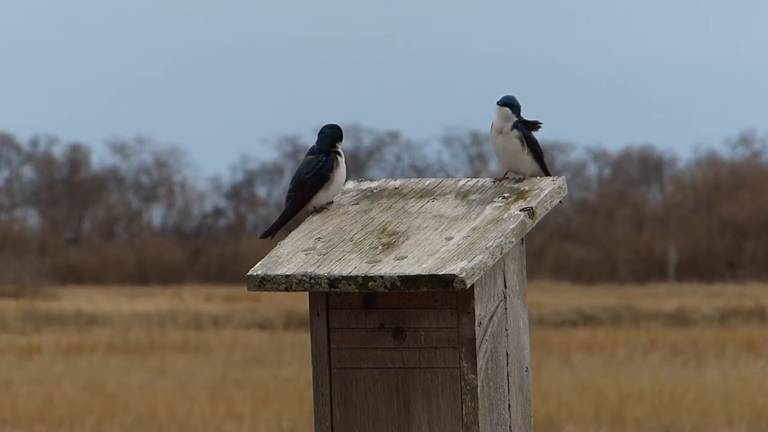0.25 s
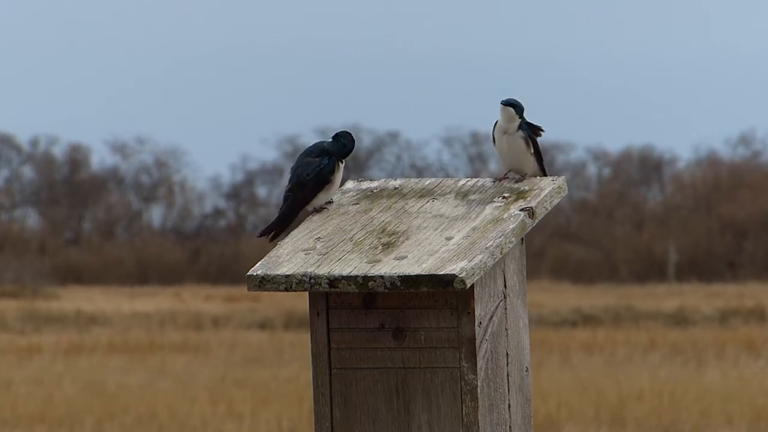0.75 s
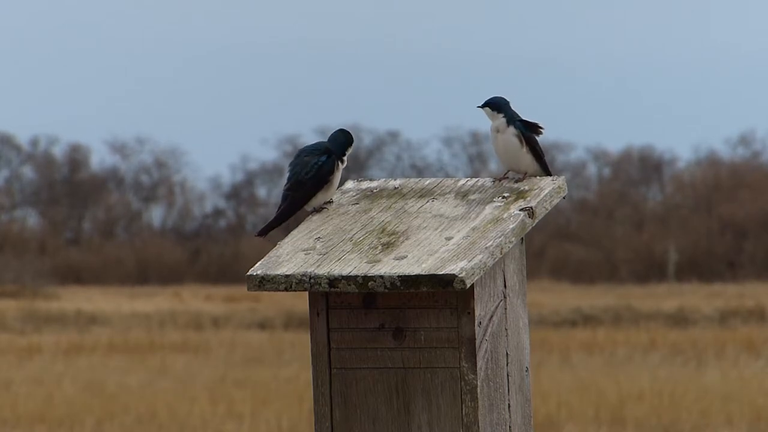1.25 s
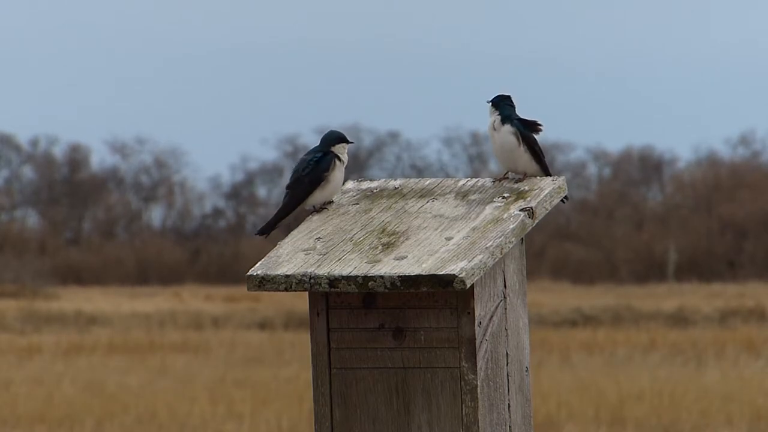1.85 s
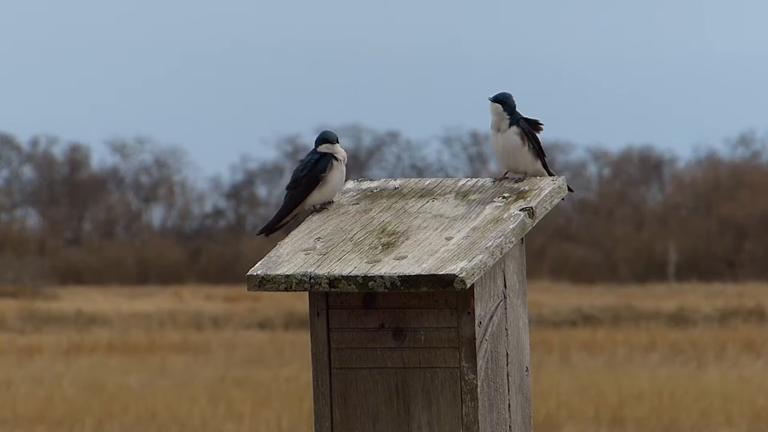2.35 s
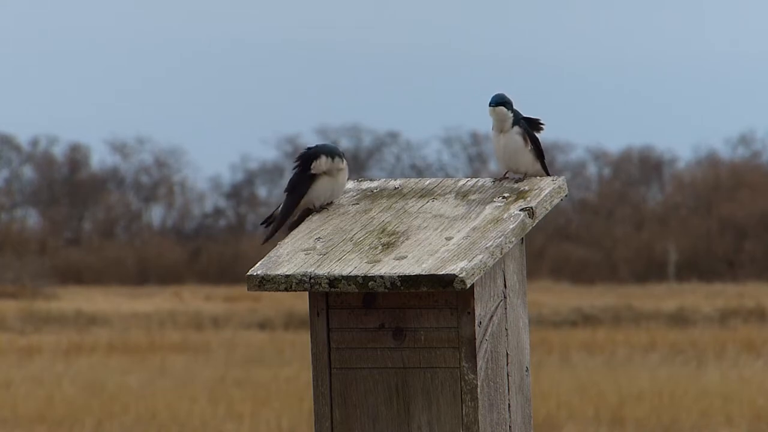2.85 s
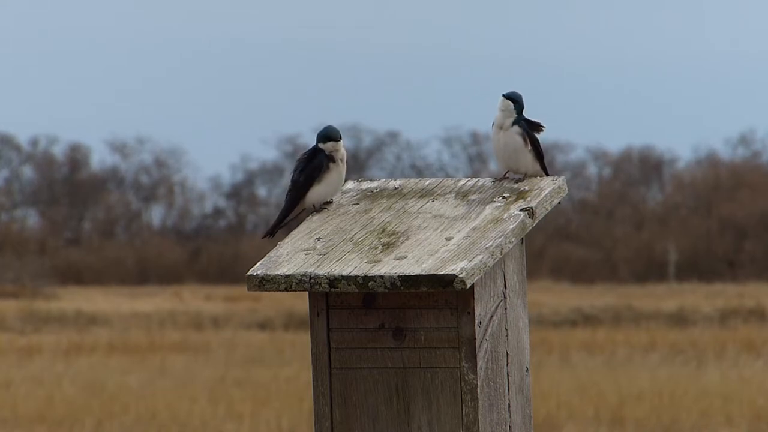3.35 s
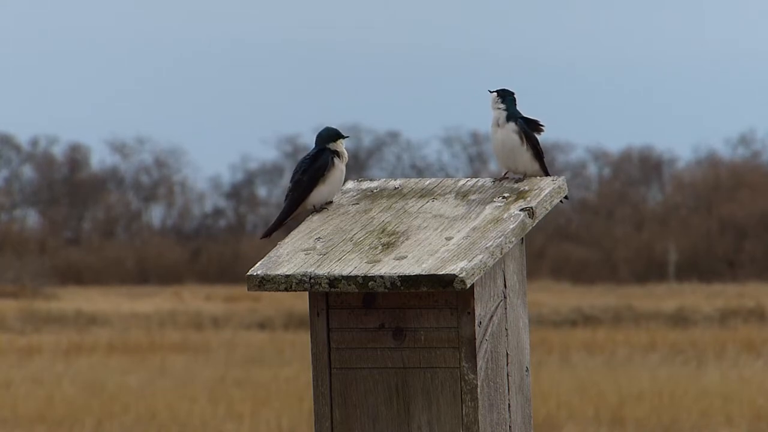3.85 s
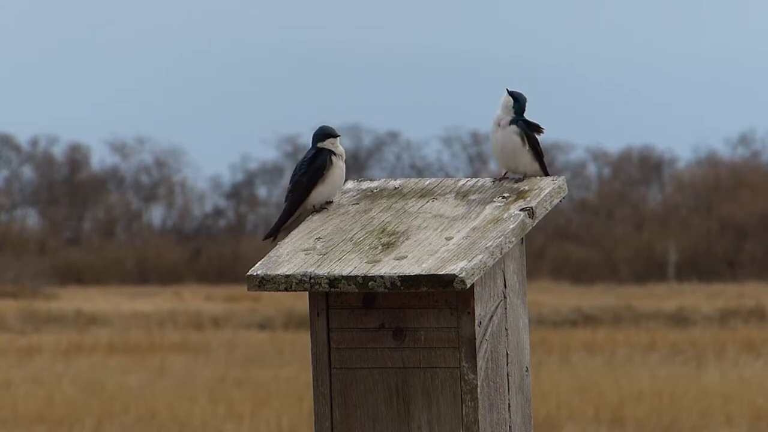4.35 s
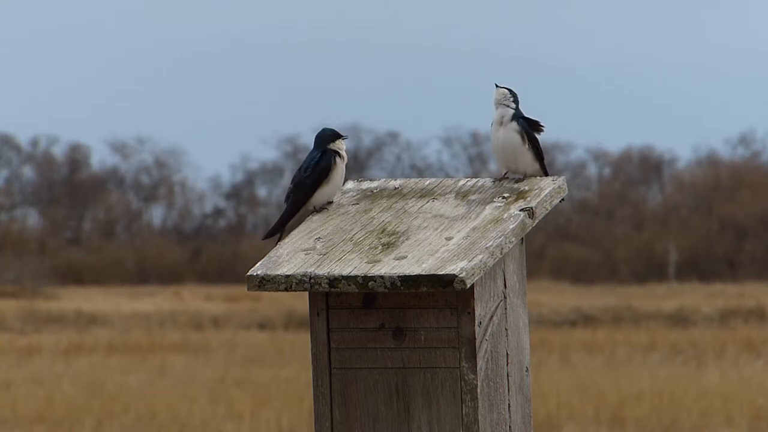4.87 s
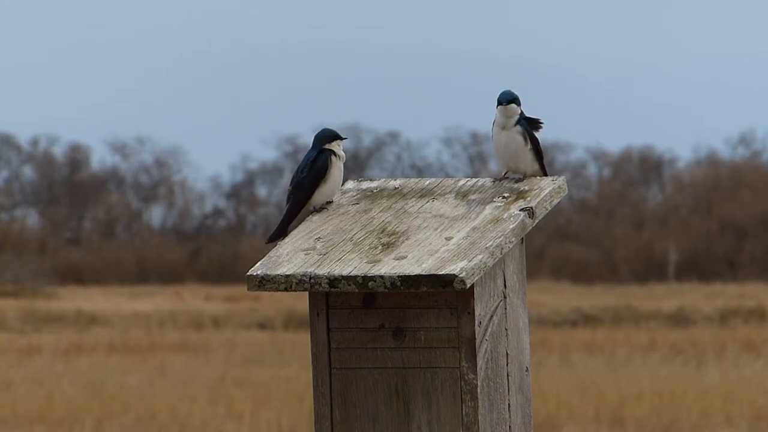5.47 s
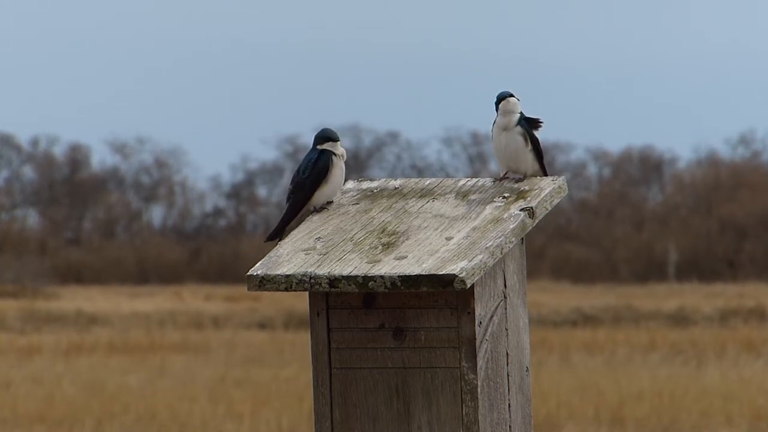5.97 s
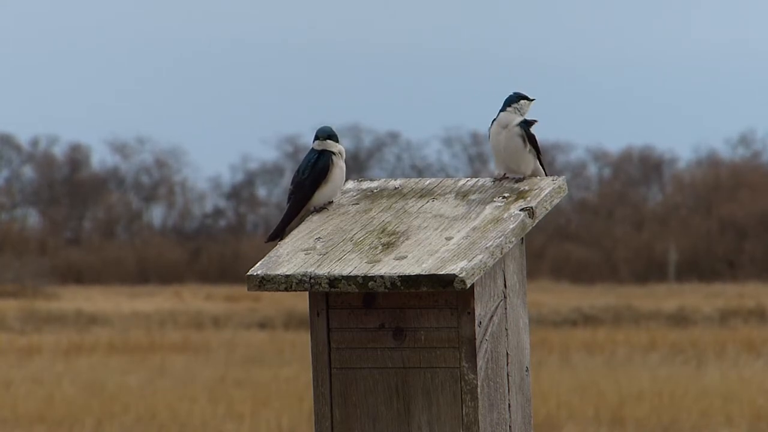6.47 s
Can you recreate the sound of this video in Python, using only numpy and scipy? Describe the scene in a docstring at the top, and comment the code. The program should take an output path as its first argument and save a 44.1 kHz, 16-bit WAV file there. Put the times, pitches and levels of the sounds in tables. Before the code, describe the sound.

A swallow twitters in quick, liquid, chattering bursts close by in an open field, with faint distant chips over steady low rumble and soft hiss.

```python
"""A low rumble from far off, a soft microphone hiss and a thin camera whine last throughout.
After half a second a distant bird chips; its chips are quick runs of three falling whistles.
From 1.2 s a tree swallow twitters on a wooden nest box in an open field: short whistled sweeps, some
overlapping from the two sides of its voice organ (syrinx), coloured by close reflections.
Near 3 s come raspy far chirrups and dry ticks; after 4.4 s the swallow sounds brighter, and lower chips follow."""
import sys
import numpy as np
from scipy import signal
from scipy.fft import rfft, irfft, next_fast_len
from scipy.io import wavfile

SR = 44100
rng = np.random.default_rng(int(sys.argv[2]) if len(sys.argv) > 2 else 0)


def master(y):
    """Save y as 16-bit WAV."""
    cut = np.clip(np.atleast_2d(y).T, -1, 1)
    pcm = np.round(cut * 32767)  # scale
    wavfile.write(sys.argv[1], SR, pcm.astype(np.int16))


N = 296352
TIME = np.arange(N) / SR

# balance of rumble and hiss across pitch: (f/Hz, relative level per Hz/dB)
AIR_SPECTRUM = [(12, -37), (20, -3.5), (38, -7.5), (87, -0.5), (219, -8), (266, -11.5), (631, -18.5),
                (725, -18), (1040, -22), (2680, -24.5), (3960, -25.5), (15500, -29)]
# how alike the background is on left and right: (f/Hz, likeness 0-1)
LEFT_RIGHT_LIKENESS = [(130, 0.97), (1200, 0.65), (5000, 0.16)]
# chips of distant birds: (start t/s, time between strokes t/s, top f/Hz, level/dB)
DISTANT_CHIPS = [(.494, .008, 4370, -57.5), (0.581, 0.0073, 4770, -50.5), (.678, 0.0094, 4580, -50.5),
                 (.776, 0.0069, 4430, -54), (.878, 0.0071, 4620, -52), (.986, 0.0071, 4330, -56.5),
                 (1.102, 0.0079, 4410, -50), (1.277, 0.0062, 4350, -51), (5.543, 0.0033, 3130, -53),
                 (5.823, 0.0026, 3280, -53.5), (6.113, .004, 3080, -50)]
# syllables of the near swallow; the two sides of the syrinx can overlap:
# (main stroke t/s, kind, beat t/s, pitch factor, level/dB,
#  then lead-in, opening and closing level/dB added to that; None = left out)
SWALLOW_SYLLABLES = [ (1.2335, "tweet", 0.0085, 0.86, -50.5, None, 0, None),
                     (1.5357, "slur", 0.015, 0.93, -49, -6, 0.5, None),
                     (1.5687, "chatter", .0175, 0.88, -43, None, -1.5, None),
                     (1.598, "chatter", 0.014, 0.98, -42, None, -4, -3),
                     (1.667, "chatter", 0.014, 1, -41.3, -2, -7, -2.5),
                     (1.7564, "chatter", 0.013, 0.96, -49.5, 4.5, 2.5, None),
                     (1.874, "tweet", 0.01, 0.98, -43.5, None, -5, -3),
                     (1.9393, "tweet", 0.0098, .99, -42.5, -9, 0, -1.5),
                     (2.094, "chatter", .012, 0.94, -38, -7, -3, -4),
                     (2.1006, "tweet", 0.012, 1.004, -39, None, -0.5, -6),
                     (2.1558, "chatter", 0.013, 1.02, -37, -2.5, -3, -3),
                     (2.1583, "tweet", 0.0098, 1.01, -38, None, -5, -2),
                     (2.233, "chatter", .0129, 1.05, -35.5, -1.5, -1.5, -4.5),
                     (2.2307, "tweet", .0172, 1.02, -40, None, -14, None),
                     (2.4604, "tweet", 0.01, 1.03, -32.5, None, -7.5, -5.5),
                     (2.524, "tweet", .01, 1.03, -34.5, -11, -6, -2),
                     (2.629, "tweet", .0105, 1.0, -39.5, None, None, -5),
                     (2.66, "chatter", 0.01, 1.02, -47, None, 5.5, None),
                     (3.4009, "tweet", .0094, 1, -43, None, -3, -9),
                     (3.4585, "tweet", 0.0094, 1.01, -43.5, 1, -8, 1),
                     (3.5223, "tweet", .01, 0.96, -42, -5, -1, -2),
                     (3.7143, "chatter", .0115, 0.89, -40, -8, -6, -5),
                     (3.7773, "chatter", .0142, 1.01, -41, -1, -4, -2),
                     (3.8541, "chatter", 0.013, 1.01, -41.5, -2.5, -5.5, -6),
                     (4.0845, "tweet", .0095, 0.97, -42.5, None, 3, -7),
                     (4.1448, "tweet", 0.011, 0.99, -39, -5.5, -6, -6),
                     (4.1705, "chatter", .013, 0.92, -42, None, -3, -4),
                     (4.2185, "tweet", .0112, .97, -44, -4, -1.5, None),
                     (4.236, "chatter", .0132, 1.015, -38, -2, -3, -4),
                     (4.54, "slur", 0.014, 1.03, -37, -4.5, 0, -12),
                     (4.5978, "gurgle", 0.013, 1, -33.8, -3.5, 0.5, -3),
                     (4.9196, "slur", 0.016, 1.02, -36.5, -5.5, -1, -13),
                     (4.991, "chatter", 0.015, 0.99, -40.5, 2.5, 5, None),
                     (5.3931, "slur", 0.013, 1.005, -38.5, 0.5, 2, -8),
                     (5.4472, "gurgle", 0.013, 1.025, -34, -1.5, -5, -3.5)]
# the strokes in each kind of syllable: lead-in, opening, main, then one or two closing:
# (centre in beats from the main stroke, length in beats, first f/Hz, middle f/Hz, last f/Hz, level/dB);
# the pitch factor scales every f
SYLLABLE_SHAPES = { "chatter": [(-2, 1.43, 2020, 3730, 1890, 0), (-0.9, 1.07, 5050, 4390, 2460, 0.5),
                   (0, 1.16, 4050, 3980, 2625, 0), (1.2, 1.0, 5700, 3500, 1970, 1)],
                   "tweet": [(-2.5, 1.59, 2300, 4015, 3455, 0), (-0.85, .72, 6100, 5380, 4800, 1),
                   (0, .76, 4615, 5000, 3800, 0), (1.26, 0.75, 5700, 4820, 2500, 0),
                   (1.8, 1.75, 5800, 3800, 3100, -6.5)], "slur": [(-2, .81, 3430, 3740, 1995, 0.5),
                   (-0.93, 1.12, 4950, 4320, 2500, 0.5), (0, 1.1, 4155, 3250, 2050, 0.5),
                   (.72, 1.55, 3100, 2440, 1930, -0.5)], "gurgle": [(-2, 1.1, 2000, 3800, 2155, -1),
                   (-1.0, .87, 4560, 4650, 2495, -2.5), (0, 1.24, 4000, 3950, 2650, 0.5),
                   (1.06, 1.41, 5225, 3620, 2800, -1)]}
# close reflections off the box and around the microphone: (delay t/s, signed gain)
CLOSE_REFLECTIONS = [(.000873, -.46), (.00176, -.05), (.00294, -.2)]
# raspy chirrups of a distant bird: (start t/s, pitch factor, level before the distance mix/dB)
DISTANT_CHIRRUPS = [(2.807, 1.05, -50), (2.967, 1.0, -45.5), (3.378, 1.08, -47)]
# strokes of one chirrup, two rising and three falling:
# (offset t/s, first f/Hz, last f/Hz, level/dB); the pitch factor scales every f
STROKES_OF_CHIRRUP = [(0, 2305, 3990, -3), (.009, 2245, 3994, -3), (0.017, 4530, 2860, -8),
                      (.028, 4700, 2900, -11), (.036, 4480, 2740, -13)]
# dry ticks: (start t/s, top f/Hz, level/dB)
DRY_TICKS = [(2.918, 2480, -52), (3.0688, 4300, -43.5)]


def from_db(db):
    """Turn decibels into gain."""
    return 10 ** (np.asarray(db) / 20)


def rms_one(x):
    """Scale to an average strength (rms) of one."""
    return x / np.sqrt(np.mean(x ** 2) + 1e-20)


def at_hz(points, hz):
    """Read a table between its points, on a log-frequency axis."""
    table = np.array(points)
    log_hz = np.log(np.maximum(hz, 1))
    return np.interp(log_hz, np.log(table[:, 0]), table[:, 1])


def add(track, start, sound):
    """Mix a short sound into a track."""
    at = max(int(round(start * SR)), 0)
    track[at:at + len(sound)] += sound[:max(N - at, 0)]


def delayed(x, seconds):
    """Delay by any fraction of a sample, by turning the phase of each frequency."""
    size = next_fast_len(N + SR // 10)
    turn = np.exp(-2j * np.pi * np.fft.rfftfreq(size, 1 / SR) * seconds)
    return irfft(rfft(x, size) * turn, size)[:N]


def sweep(length, pitches, level_db, overtone_db=-40, waver=0.014, flutter_db=1.75, fullness=0.77, hook=1.07):
    """One puff of a bird's voice: a near-pure tone swells and fades as its pitch bends through the points."""
    u = np.linspace(0, 1, max(int(length * SR), 2))
    # the pitch lingers in mid-note and hooks away faster at both ends
    progress = np.sign(2 * u - 1) * np.abs(2 * u - 1) ** hook
    curve = np.polyfit(np.linspace(-1, 1, len(pitches)), pitches, len(pitches) - 1)
    hz = np.polyval(curve, progress)
    # ten random points each make pitch (a fraction) and level (dB) unsteady
    knots = np.linspace(0, 1, 10)
    unsteady, flutter = [np.interp(u, knots, row) for row in rng.standard_normal((2, 10))]
    phase = 2 * np.pi * np.cumsum(hz * (1 + waver * unsteady)) / SR
    # the bill lets the octave through only while the note is below about 4100 Hz
    octave = from_db(overtone_db) / (1 + (hz / 4100) ** 20)
    swell = np.abs(np.sin(np.pi * u)) ** fullness
    tone = np.sin(phase) + octave * np.sin(2 * phase)
    return from_db(level_db + flutter_db * flutter) * swell * tone


def scatter(x, t60, onset, width=0.033):
    """Grass and trees return a blurred tail; it falls 60 dB in t60 seconds and differs a little per side."""
    t = TIME[:SR // 2]
    fade = from_db(-60 * t / t60) * (1 - np.exp(-t / onset))
    mid, side = rng.standard_normal((2, len(t))) * fade
    tail = mid + width * side * [[1], [-1]]
    tail /= np.sqrt(np.sum(tail ** 2, axis=1, keepdims=True))
    return signal.fftconvolve(x[None], tail, axes=1)[:, :N]


def background():
    """Shaped noise: the distant rumble is nearly alike on both sides, the hiss above it mostly separate."""
    hz = np.fft.rfftfreq(N, 1 / SR)
    mid, side = rfft(rng.standard_normal((2, N))) * from_db(at_hz(AIR_SPECTRUM, hz))
    alike = np.clip(at_hz(LEFT_RIGHT_LIKENESS, hz), 0, 1)
    both_sides = np.sqrt(1 + alike) * mid + np.sqrt(1 - alike) * side * [[1], [-1]]
    noise = rms_one(irfft(both_sides, N))
    # the right side is slightly louder
    return from_db(-50 + np.array([[-.12], [.12]])) * noise


def camera_whine():
    """A thin, steady sine tone from the camera."""
    return from_db(-74.5) * np.sin(2 * np.pi * 15734 * TIME)


def chips(fall=0.567, stroke_s=0.00906, rasp=0.022):
    """Each chip is three strokes in a row, falling to a fraction of their top pitch."""
    track = np.zeros(N)
    for start, step, top_hz, level_db in DISTANT_CHIPS:
        for k, stroke_db in enumerate([-3, 0, -4]):
            stroke = sweep(stroke_s, [top_hz, top_hz * fall], level_db + stroke_db, waver=rasp)
            add(track, start + k * step, stroke)
    return track


def syllable(kind, beat, pitch, level_db, lead_db, open_db, close_db):
    """Place the sweeps of one syllable on its beat: (offset t/s, length t/s, pitches f/Hz, level/dB)."""
    accents = [lead_db, open_db, 0, close_db, close_db]
    for (centre, beats, *pitches, stroke_db), accent_db in zip(SYLLABLE_SHAPES[kind], accents):
        if accent_db is None:
            continue
        offset = (centre - beats / 2) * beat
        yield offset, beats * beat, pitch * np.array(pitches), level_db + stroke_db + accent_db


def swallow(head_up_s=4.4, low_overtone_db=-21, raised_overtone_db=-17.5):
    """The near bird; with head raised and bill wide open the octave comes out more strongly."""
    song = np.zeros(N)
    for at, *manner in SWALLOW_SYLLABLES:
        overtone_db = raised_overtone_db if at > head_up_s else low_overtone_db
        for offset, length, pitches, level_db in syllable(*manner):
            add(song, at + offset, sweep(length, pitches, level_db, overtone_db))
    # the reflections cut notches that each sweep passes through, which breaks it into beads
    song = song + sum(gain * delayed(song, delay) for delay, gain in CLOSE_REFLECTIONS)
    return song + from_db(-10) * scatter(song, t60=0.098, onset=0.0021)


def chirrups(stroke_s=0.018, rasp=0.07):
    """Each chirrup is five overlapping strokes; strong random wavering of pitch makes them rough."""
    track = np.zeros(N)
    for start, pitch, level_db in DISTANT_CHIRRUPS:
        for offset, first, last, stroke_db in STROKES_OF_CHIRRUP:
            stroke = sweep(stroke_s, [first * pitch, last * pitch], level_db + stroke_db, waver=rasp)
            add(track, start + offset, stroke)
    return track


def distant_birds():
    """The farther, chirruping bird arrives more by scattered paths than by the straight one."""
    chip_track, chirrup_track = chips(), chirrups()
    straight = chip_track + chirrup_track / 2
    scattered = scatter(chip_track / 2 + chirrup_track, t60=0.11, onset=0.00046)
    return straight + from_db(2.5) * scattered


def ticks(length=0.0026):
    """Very short sweeps dropping one octave, heard as dry ticks."""
    track = np.zeros(N)
    for start, top_hz, level_db in DRY_TICKS:
        add(track, start, sweep(length, [top_hz, top_hz / 2], level_db))
    return track + from_db(-5) * scatter(track, t60=0.031, onset=0.001)


def scene():
    """Birds and ticks over the steady background."""
    return background() + swallow() + distant_birds() + ticks()


def record(dry):
    """The camera adds its whine, and a steep filter cuts the top above 15900 Hz."""
    low_pass = signal.ellip(12, .1, 70, 15900, fs=SR, output="sos")
    return signal.sosfilt(low_pass, dry + camera_whine())


dry = scene()
out = record(dry)
master(out)
```